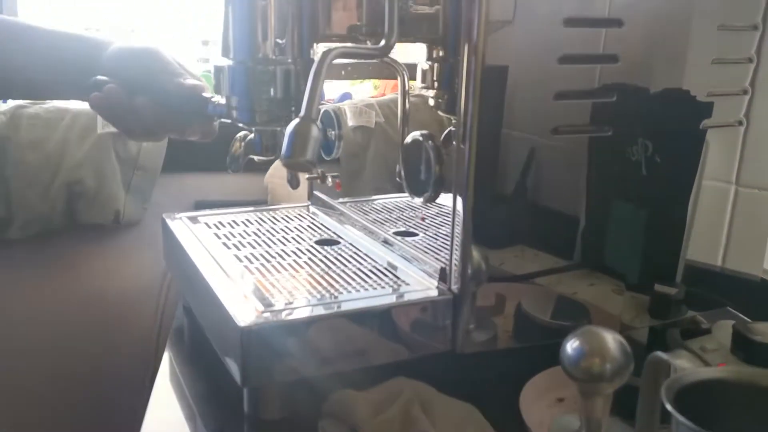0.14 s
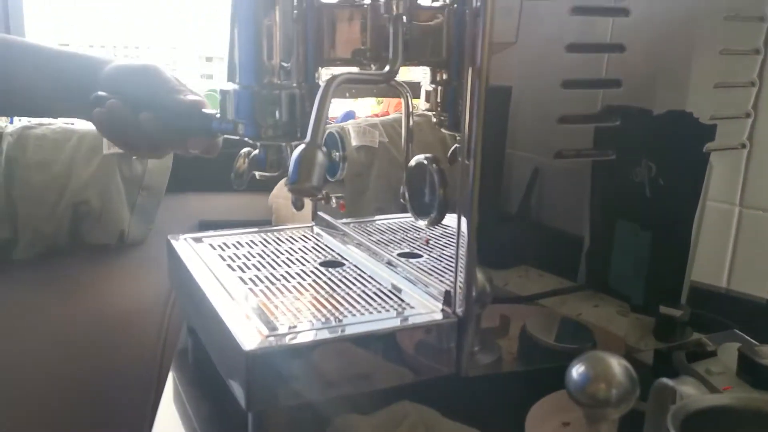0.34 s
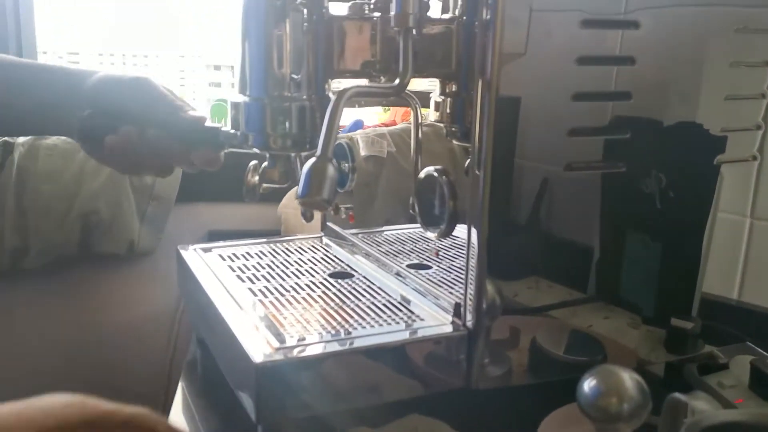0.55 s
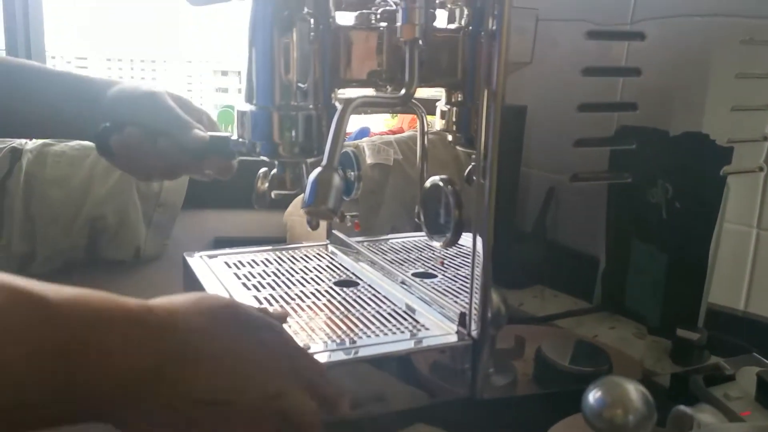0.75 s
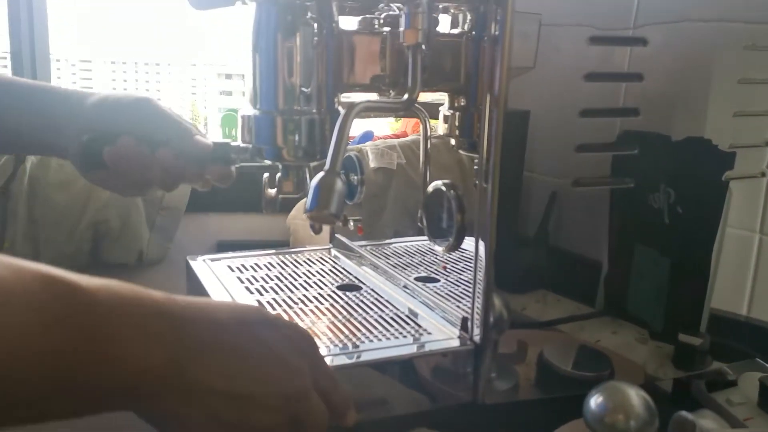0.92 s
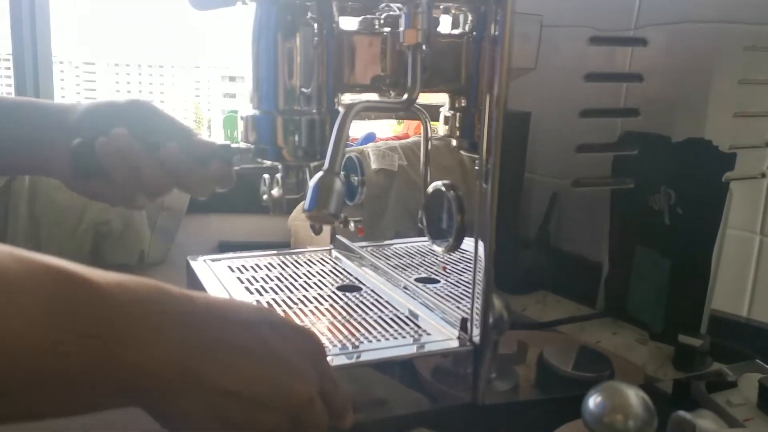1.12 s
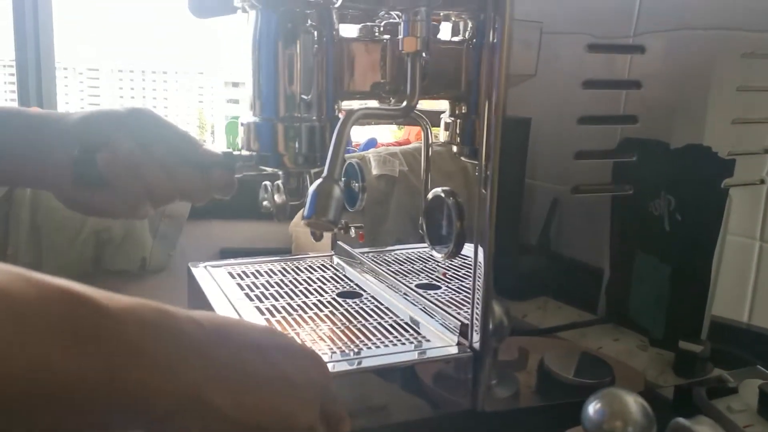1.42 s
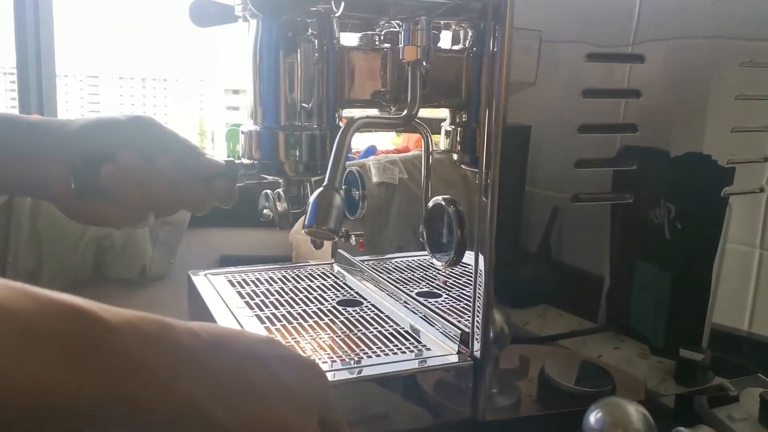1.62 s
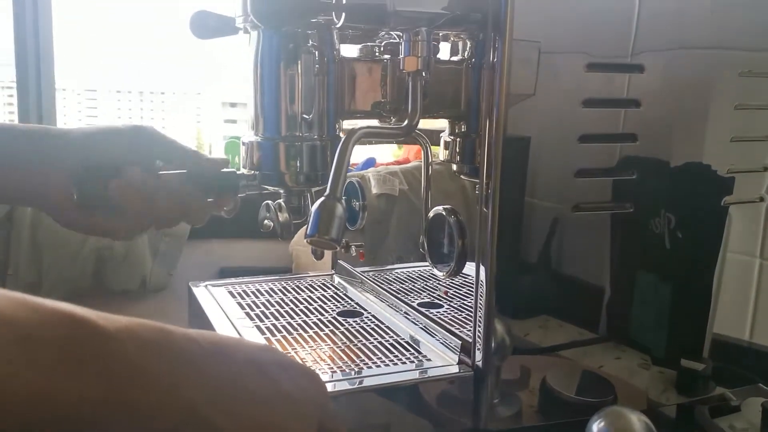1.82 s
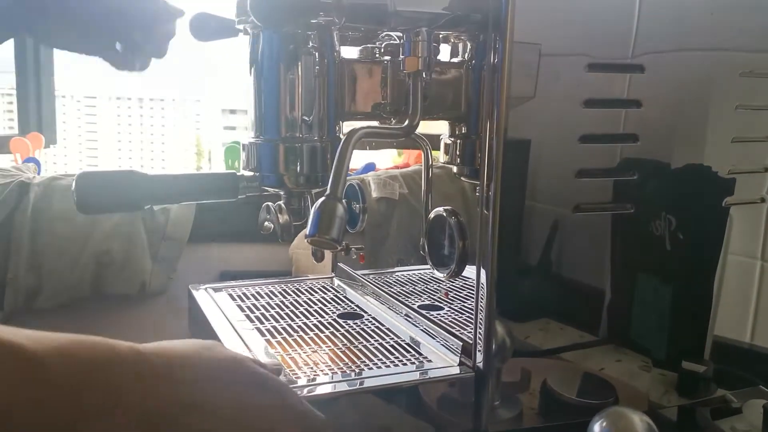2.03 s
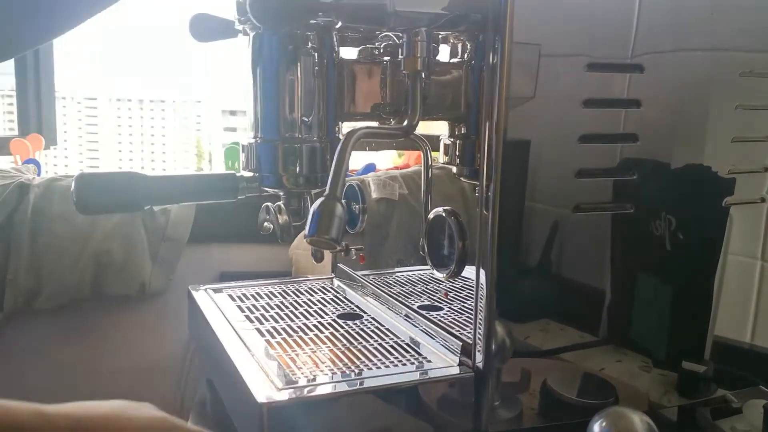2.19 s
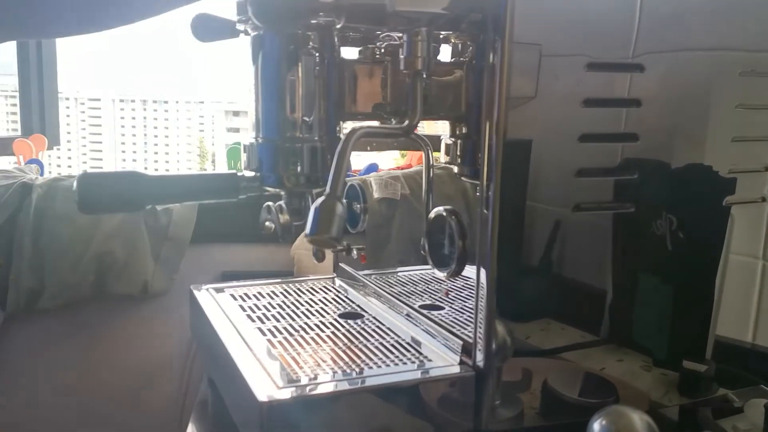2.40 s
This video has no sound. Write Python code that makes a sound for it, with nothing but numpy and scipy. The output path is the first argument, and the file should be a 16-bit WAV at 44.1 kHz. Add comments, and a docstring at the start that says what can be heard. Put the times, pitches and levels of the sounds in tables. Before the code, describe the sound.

A steel portafilter clunks and rattles into an espresso machine, its heavy body booming, then knocks once more as it locks; a faint hiss fades, and dry clicks follow in a quiet kitchen, heard close and dull.

```python
"""A quiet kitchen with a low steady room noise; a close microphone, dull above 8 kHz, hears an espresso machine.
A steel portafilter touches the group head and clunks home with a rattle: noise bursts and decaying modes.
The casing booms in low sine modes; the steel knocks once more as it locks, with faint contacts after it.
Meanwhile a soft hiss of coloured noise swells and fades. A dry click on the right follows, then small
noise ticks, with a second dry click on the left among them; the clicks are very short high-passed sines."""
import sys
import numpy as np
from scipy import signal
from scipy.fft import rfft, irfft, next_fast_len
from scipy.io import wavfile
from scipy.ndimage import uniform_filter1d

SR = 44100
rng = np.random.default_rng(int(sys.argv[2]) if len(sys.argv) > 2 else 0)


def int16_out(signal):
    """Quantize to a 16-bit WAV file."""
    q = np.round(np.clip(np.atleast_2d(signal).T, -1, 1) * 32767)
    wavfile.write(sys.argv[1], SR, q.astype(np.int16))


N = 112454  # samples

# Steel-on-steel contacts: start_s, level_db, clack_db, knock_db, casing_db, group_head_db,
# portafilter_db, bass_db, treble_db
CONTACTS = [(0.1765, -45.5, -14, 0, -2, -23, 16, 7, 15), (0.2238, -31, -24, 8.5, -4, -9.5, -6, 9.5, 2.5),
            (0.2292, -20.5, 9.5, -0.5, -0.5, -16.5, -5.5, -3, -3.5),
            (0.2332, -29, -4, -16, -7.5, -15, 4.5, -3.5, 4), (0.2601, -27, -8, 2, -4, -4.5, -7, 0, -1.5),
            (0.2835, -22.5, -2, -24, -6, -1.5, -23, -2, -7.5),
            (0.5191, -28, 5.5, -29, -21, 3.5, -40, -8, -0.5), (0.5252, -40, -3, -20, -12, 9, -7, -14, -21),
            (0.555, -42, -10, 1, -7, 9, -15, 6.5, -22), (0.7635, -59.5, -15.5, 12, -5, -10, 17, 6, 16),
            (0.8885, -48, 6, -18, -5, 6, -7, 4.5, -1.5), (0.939, -58, -23, -10, -13, -6, 8, 0, 11.5)]
# Ringing modes of the group head: pitch_hz, level_db
GROUP_MODES = [(745, -17), (938, -21), (1205, -13), (1250, -14), (1322, -13), (1482, -14), (1572, -18),
               (1778, -16), (1919, -12), (2089, -14), (2377, -11), (2425, -11), (2903, -20), (3500, -21),
               (3848, -19), (6350, -19), (6680, -19)]
# Ringing modes of the casing: pitch_hz, level_db
CASING_MODES = [(537, -11), (611, -13), (701, -11), (790, -18), (921, -12), (1125, -16), (1385, -15),
                (1640, -18), (1984, -14), (2058, -11), (2112, -9), (2151, -12), (2242, -13), (2374, -8),
                (2755, -21), (2902, -16)]
# Ringing modes of the portafilter: pitch_hz, level_db
PORTAFILTER_MODES = [(1290, -22), (1522, -17), (1610, -19), (2380, -22), (3343, -22), (4148, -10),
                     (4330, -21), (5280, -18), (5515, -17), (7610, -23)]
# Damped modes of the clack: pitch_hz, level_db, t60_s
CLACK_MODES = [(2090, -7, .018), (2345, 0.5, 0.029)]
# Damped panel modes of the knock: pitch_hz, level_db, t60_s
KNOCK_MODES = [(660, -8, 0.027), (697, -5, 0.049), (892, -9.5, 0.055), (1490, -16, 0.051)]
# Colour of the dense short modes of the steelwork: pitch_hz, density_db (per Hz)
CLANG_COLOUR = [(100, -3.5), (400, -6), (700, -0.5), (1050, -2.5), (1400, 0), (2300, -0.5), (3100, -9),
                (3900, -5), (4400, -12), (5500, -6.5), (7200, -10), (8300, -18), (12000, -18),
                (15000, -22.5)]
# Decay of those dense modes: pitch_hz, t60_s
CLANG_DECAY = [(300, 0.21), (1500, 0.061), (3000, 0.15), (7000, 0.062)]
# Decay of the kitchen's reverberation: pitch_hz, t60_s
ROOM_DECAY = [(200, .5), (1000, 0.56), (2500, 0.36), (7000, 0.42)]
# The machine rocks on its feet: start_s, level_db, favoured_hz
PUSHES = [(0.229, -36.5, 230), (0.272, -27.5, 272), (0.317, -27, 180), (0.524, -33.5, 240),
          (0.552, -36, 303)]
# Low modes of the heavy body: pitch_hz, level_db, t60_s
BODY_MODES = [(178.5, 0, .24), (198, -11, .95), (283, -7, .45), (322, -9, .3), (425, -8, .22), (48, 5, .45),
              (96, -4, .4)]
# Swell of the hiss: time_s, level_db
HISS_SWELL = [(.52, -78.5), (.58, -57.5), (.7, -56.5), (.9, -53.5), (1.1, -60.5), (1.35, -59.5),
              (1.45, -68), (1.6, -96)]
# Spectrum of the hiss: pitch_hz, density_db (per Hz)
HISS_SPECTRUM = [(500, 5.5), (1300, -6), (2500, 0), (3400, -6.5), (3900, 1.5), (4150, 7), (4400, 4),
                 (4750, 0), (5400, 0), (6800, -3.5), (9000, 1.5), (14000, -37)]
# Dry clicks at the microphone: start_s, level_db, pitch_hz, t60_s, low_edge_hz, left_over_right_db
DRY_CLICKS = [(1.3897, -24, 3220, 0.0022, 1500, -25), (1.3921, -15.5, 1960, .0014, 1150, -30),
              (1.3924, -17.5, 6050, 0.0011, 4570, -30), (1.8599, -19, 7730, 0.0043, 3000, 13)]
# Faint handling ticks: start_s, level_db, t60_s
HANDLING_TICKS = [(1.4962, -53.5, .025), (1.785, -58, .02), (1.947, -51, 0.068), (2.023, -60, 0.26)]
# Spectrum of a tick: pitch_hz, density_db (per Hz)
TICK_COLOUR = [(500, -20), (1800, -15), (2600, 9.5), (3300, -17), (5500, -6), (7000, -1), (14000, -8.5)]
# Spectrum of the kitchen's steady noise: pitch_hz, density_db (per Hz)
KITCHEN_COLOUR = [(20, -5), (48, 4.5), (70, -2.5), (100, -5), (130, -2.5), (190, -2), (290, -4.5),
                  (450, -12), (750, -16), (1300, -23), (2400, -27.5), (3500, -35), (6000, -39), (7400, -34),
                  (14000, -40)]
# Stereo width: pitch_hz, side_over_mid_db
STEREO_WIDTH = [(30, -13), (70, -11), (170, -19.5), (500, -19), (1500, -13), (2500, -10.5), (4200, 0),
                (7500, -1.5)]
# Microphone response: pitch_hz, gain_db
MICROPHONE_RESPONSE = [(7200, -1), (7800, -7), (8200, -17.5), (10000, -20.5), (15000, -20)]

RING = np.arange(SR * 3 // 4) / SR  # seconds since a sound's start
CLANG_DB, CRACK_DB, CRACK_T60_S = -2.5, 0.5, 0.013
ATTACK_S = 0.00017  # time constant of a contact's onset
BASS_HZ, TREBLE_HZ = 990, 3300  # edges of each contact's tone shelves
RING_T60_S, RING_REFERENCE_HZ = 0.18, 1000  # ring time at the reference pitch
RING_SHORTENS = 0.5  # power by which ring time falls with frequency
SCATTER_DB = 2  # standard deviation of mode levels from ring to ring
THUMP_FALL_DB = 9.5  # per octave away from the favoured pitch
ROOM_DB, KITCHEN_DB = -14, -49.5
LEAN_DB, LEFT_LEAD_S = -1.37, 0.00002  # left over right; how early the left ear is
TOP_HZ = 15500  # microphone band limit


def amp(db):
    """Decibels to gain."""
    return 10 ** (np.asarray(db) / 20)


def unit(x):
    """Scale to rms 1."""
    return x / np.sqrt(np.mean(x ** 2) + 1e-20)


def along(points, hz):
    """Read (Hz, value) points on a log frequency axis."""
    point_hz, values = np.transpose(points)
    return np.interp(np.log(hz + 1), np.log(point_hz + 1), values)


def fade(t, t60):
    """Exponential decay by 60 dB in t60 seconds."""
    return np.exp(-np.log(1000) * t / np.maximum(t60, 1e-4))


def add(out, start_s, x):
    """Mix x into out from start_s, cutting what runs past the end."""
    part = out[:, round(start_s * SR):][:, :x.shape[-1]]
    part += x[..., :part.shape[1]]


def filtered(x, response):
    """Multiply the spectrum of x by a response of frequency."""
    n = x.shape[-1]
    padded = next_fast_len(n + SR // 4)
    spectrum = rfft(x, padded) * response(np.fft.rfftfreq(padded, 1 / SR))
    return irfft(spectrum, padded)[..., :n]


def high_pass(x, edge_hz, order):
    """A steep causal low cut."""
    sos = signal.butter(order, edge_hz, "high", fs=SR, output="sos")
    return signal.sosfilt(sos, x)


def shelf(hz, edge_hz, order):
    """A smooth step from 0 below the edge to 1 above it."""
    return 1 - 1 / (1 + (hz / edge_hz) ** order)


def noise(colour, size):
    """Two unrelated coloured noises, together of rms 1."""
    white = rng.standard_normal((2, size))
    return unit(filtered(white, lambda hz: amp(along(colour, hz))))


def dying(x, t60s):
    """Let each frequency of x die at its own speed."""
    hz, t, z = signal.stft(x, SR, nperseg=256)
    decay = fade(t, along(t60s, hz)[:, None])
    return signal.istft(z * decay, SR, nperseg=256)[1][:, :x.shape[1]]


def kitchen():
    """Steady coloured noise of the room, strongest in the bass."""
    return amp(KITCHEN_DB) * noise(KITCHEN_COLOUR, size=N)


def steel_ring(modes):
    """Struck steel in mid and side: random phases and levels, and shorter decay the higher the mode."""
    hz, db = np.transpose(modes)[:, :, None]
    t60 = RING_T60_S * (hz / RING_REFERENCE_HZ) ** -RING_SHORTENS
    level = amp(db + SCATTER_DB * rng.standard_normal((2, len(modes), 1)))
    phase = rng.uniform(0, 2 * np.pi, level.shape)
    turn, decay = 2 * np.pi * hz * RING, fade(RING, t60)
    sines = (level * np.cos(phase))[..., 0] @ (np.sin(turn) * decay)
    cosines = (level * np.sin(phase))[..., 0] @ (np.cos(turn) * decay)
    return sines + cosines


def damped(modes):
    """Short sine modes that start together at the blow, with alternating sign."""
    total = np.zeros(len(RING))
    for k, (hz, db, t60) in enumerate(modes):
        total += (-1) ** k * amp(db) * np.sin(2 * np.pi * hz * RING) * fade(RING, t60)
    return total


def steelwork():
    """Noise whose bands die at their own speeds, like dense short modes, with a quicker crack."""
    clang = amp(CLANG_DB) * dying(noise(CLANG_COLOUR, size=len(RING)), CLANG_DECAY)
    crack = amp(CRACK_DB) * noise(CLANG_COLOUR, size=len(RING)) * fade(RING, CRACK_T60_S)
    return clang + crack


def portafilter():
    """Each contact cracks, clacks and knocks, and rings the casing, group head and portafilter."""
    out = np.zeros((2, N))
    onset = 1 - np.exp(-RING / ATTACK_S)
    for (start_s, level_db, clack_db, knock_db, casing_db, group_head_db,
         portafilter_db, bass_db, treble_db) in CONTACTS:
        def tone(hz):
            """This contact's bass and treble balance."""
            bass = bass_db * (1 - shelf(hz, BASS_HZ, order=8))
            return amp(bass + treble_db * shelf(hz, TREBLE_HZ, order=4))

        blow = filtered(steelwork() + amp(group_head_db) * steel_ring(GROUP_MODES), tone)
        blow += amp(casing_db) * steel_ring(CASING_MODES)
        blow += amp(portafilter_db) * steel_ring(PORTAFILTER_MODES)
        # clack and knock sit in the middle (mid channel only)
        blow[0] += amp(clack_db) * damped(CLACK_MODES) + amp(knock_db) * damped(KNOCK_MODES)
        add(out, start_s, amp(level_db) * blow * onset)
    return out


def room(pair):
    """The short diffuse answer of the kitchen: decaying noise convolved with the mid signal."""
    tail = dying(rng.standard_normal((2, SR // 2)), ROOM_DECAY)
    tail /= np.linalg.norm(tail[0])
    tail = np.pad(tail, ((0, 0), (SR // 150, 0)))  # silence before the tail
    return signal.fftconvolve(pair[:1], tail, axes=1)[:, :N]


def boom(rise_s=0.0047):
    """The heavy body answers each push with its low modes, in the mid channel only."""
    out = np.zeros((2, N))
    hz, mode_db, t60 = np.transpose(BODY_MODES)[:, :, None]
    onset = 1 - np.exp(-RING / rise_s)
    for start_s, level_db, favoured_hz in PUSHES:
        octaves_away = abs(np.log2(hz / favoured_hz))
        level = amp(mode_db - THUMP_FALL_DB * octaves_away)
        modes = level * np.sin(2 * np.pi * hz * RING) * fade(RING, t60)
        add(out[:1], start_s, amp(level_db) * modes.sum(axis=0) * onset)
    return out


def hiss(flutter_db=1.3):
    """Soft noise with a whistling resonance swells and fades while the handle is tightened."""
    time_s, level_db = np.transpose(HISS_SWELL)
    swell_db = np.interp(np.arange(N) / SR, time_s, level_db, left=-np.inf, right=-np.inf)
    flutter = unit(uniform_filter1d(rng.standard_normal(N), size=1200))
    return amp(swell_db + flutter_db * flutter) * noise(HISS_SPECTRUM, size=N)


def clicks():
    """Very short, thin, dry decaying sines, each close to one side."""
    out = np.zeros((2, N))
    for start_s, level_db, pitch_hz, t60_s, low_edge_hz, pan_db in DRY_CLICKS:
        snap = np.sin(2 * np.pi * pitch_hz * RING) * fade(RING, t60_s)
        snap = high_pass(snap, low_edge_hz, order=6)
        sides = unit(amp([[pan_db / 2], [-pan_db / 2]]))
        add(out, start_s, amp(level_db) * sides * snap)
    return out


def ticks():
    """Light touches without a ring: decaying coloured noise."""
    out = np.zeros((2, N))
    for start_s, level_db, t60_s in HANDLING_TICKS:
        tick = noise(TICK_COLOUR, size=len(RING)) * fade(RING, t60_s)
        add(out, start_s, amp(level_db) * tick)
    return out


def stereo(pair):
    """Mid and side to left and right: narrow bass, wide treble, the left ear a little early."""
    mid, side = filtered(pair, lambda hz: np.array([np.ones_like(hz), amp(along(STEREO_WIDTH, hz))]))
    ears = np.array([mid + side, mid - side]) * amp([[LEAN_DB / 2], [-LEAN_DB / 2]])
    # half the lead advances the left ear, half delays the right
    direction = np.array([[1], [-1]])
    return filtered(ears, lambda hz: np.exp(1j * np.pi * hz * LEFT_LEAD_S * direction))


def scene():
    """The machine in the kitchen; only the steel contacts excite the room, and the clicks stay dry."""
    steel = portafilter()
    pair = kitchen() + steel + amp(ROOM_DB) * room(steel) + boom() + hiss() + ticks()
    return stereo(pair) + clicks()


def record(dry):
    """The microphone drops steeply near 8 kHz and keeps nothing above its band limit."""
    return filtered(dry, lambda hz: amp(along(MICROPHONE_RESPONSE, hz)) * (hz < TOP_HZ))


dry = scene()
out = record(dry)
int16_out(out)
```